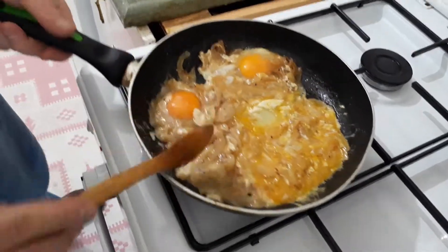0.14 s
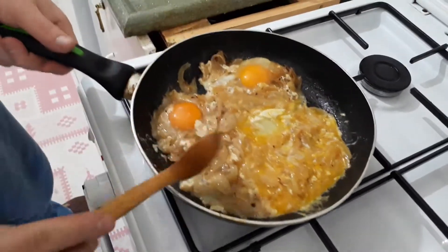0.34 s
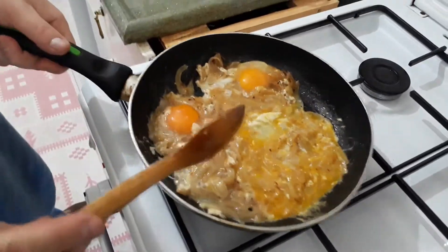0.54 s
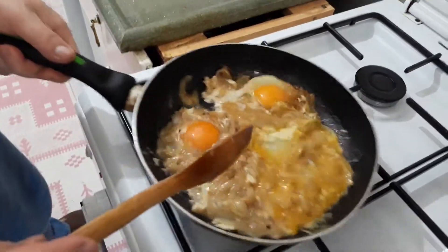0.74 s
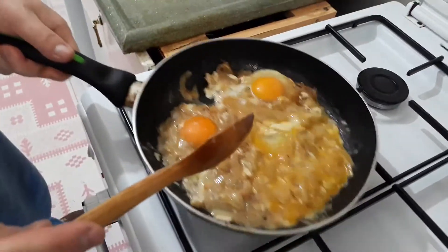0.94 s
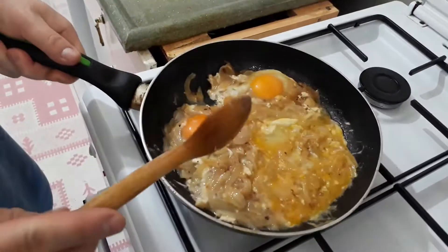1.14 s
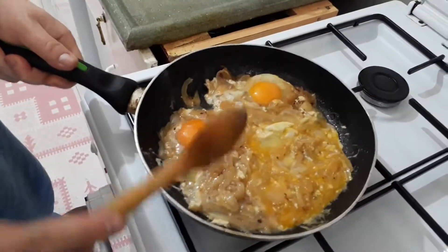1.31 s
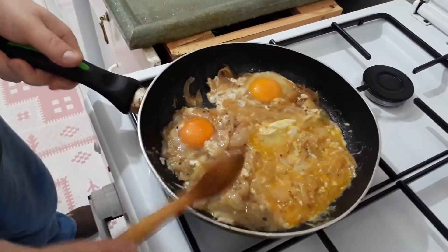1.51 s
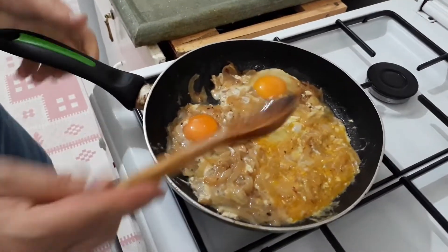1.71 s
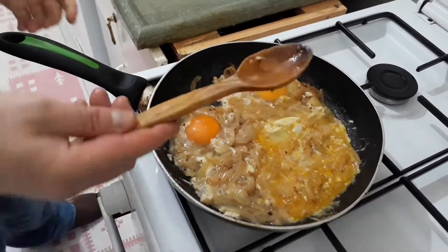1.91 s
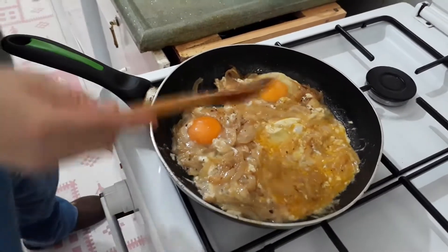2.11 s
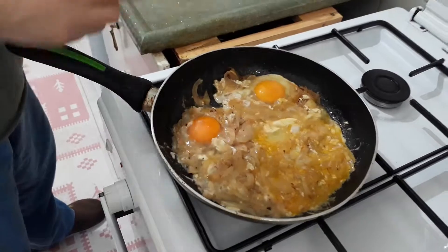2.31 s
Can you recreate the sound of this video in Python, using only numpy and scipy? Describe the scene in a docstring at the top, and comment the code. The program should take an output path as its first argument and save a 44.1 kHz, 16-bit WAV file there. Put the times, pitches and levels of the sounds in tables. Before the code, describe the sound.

A frying pan bangs on a gas hob's iron grate, close and nearly mono in a small, live kitchen. Two heavy, clattering bumps at 0.25 and 0.4 seconds make the sheet metal boom. A soft, low slide follows around 0.75, then uneven woody knocks from 0.9 to 1.4, strongest near 1.15. Three hard bumps at 1.45-1.65 distort slightly and ring away into faint, steady egg sizzle until about 2.4.

```python
"""A frying pan of eggs is jogged on a gas hob in a small kitchen, close by.
The eggs sizzle faintly throughout. First come two heavy bumps: the pan clatters on its iron grate and the
sheet-metal hob booms. Then the pan slides once on the grate in many small slips, lighter woody knocks follow,
and three more bumps close the scene. Blows are bursts of decaying noise plus decaying cosine modes;
the sizzle is coloured noise and random clicks. The loudest blows overload the microphone."""
import sys
import numpy as np
from scipy import signal
from scipy.fft import rfft, irfft
from scipy.io import wavfile

SR = 44100
rng = np.random.default_rng(int(sys.argv[2]) if len(sys.argv) > 2 else 0)


def wav_record(signal):
    """Record a signal, one row per channel, as 16-bit PCM in the file named by sys.argv[1]."""
    frames = np.transpose(np.atleast_2d(signal))
    bounded = np.clip(frames, -1, 1)
    # unit amplitude maps onto the largest positive 16-bit level
    quanta = np.round(bounded * 32767).astype(np.int16)
    wavfile.write(sys.argv[1], SR, quanta)


N = 103635
TIME = np.arange(N) / SR


def from_db(db):
    """Decibels to gain."""
    return 10 ** (np.asarray(db) / 20)


def rms_one(x):
    """Scale to rms 1."""
    return x / np.sqrt(np.mean(x ** 2) + 1e-20)


def energy_one(x):
    """Scale an impulse response to unit energy."""
    return x / np.sqrt(np.sum(x ** 2))


def at_hz(points, hz):
    """Read a table on a log-frequency axis."""
    table_hz, values = np.transpose(points)
    return np.interp(np.log(np.maximum(hz, 1)), np.log(table_hz), values)


def noise(colour, dull_hz=None, size=N):
    """Noise of a given colour with rms near 1, then optionally dulled by a gentle treble roll-off."""
    hz = np.fft.rfftfreq(size, 1 / SR)
    gain = rms_one(from_db(at_hz(colour, hz)))
    if dull_hz:
        gain = gain / np.sqrt(1 + (hz / dull_hz) ** 2)
    return irfft(rfft(rng.standard_normal(size)) * gain, size)


def dense_ring(colour, t60, dull_hz=None, size=8192):
    """Decaying noise stands for many overlapping modes that die together; t60 in s."""
    return noise(colour, dull_hz, size) * from_db(-60 * TIME[:size] / t60)


def add(out, s, x):
    """Mix x into out from time s."""
    i = max(int(s * SR), 0)
    out[i:i + len(x)] += x[:N - i]


def through(x, response):
    """Play x into an impulse response."""
    return signal.fftconvolve(x, response)[:N]


def decay(t60):
    """One second of exponential decay, down 60 dB after t60 seconds."""
    return np.exp(-np.log(1000) * TIME[:SR] / t60)


def modes(table):
    """One blow on a set of modes, each with a random sign and a strength of its own."""
    ring = np.zeros(SR)
    for hz, db, t60 in table:
        sign = rng.choice([-1, 1])
        strength = from_db(db + 3 * rng.normal())  # 3 dB spread from blow to blow
        ring += sign * strength * decay(t60) * np.cos(2 * np.pi * hz * TIME[:SR])
    return ring


def grains(per_s, spread_db):
    """Random clicks of uneven size and sign."""
    sizes = from_db(spread_db * np.minimum(rng.exponential(1, N), 4)) * rng.choice([-1, 1], N)
    return sizes * (rng.random(N) < per_s / SR)


# modes of the pan: (frequency [Hz], level in a bump [dB], level in a knock [dB], t60 [s])
PAN_MODES = [(382, -21, -24.5, 0.49), (474.6, -20, -16, .25), (494, -22.5, -19.5, 0.4),
             (603.6, -19.5, -38, 0.54), (726, -23.5, -10, 0.12), (773, -8, -7.5, 0.099),
             (820, -18.5, -18, 0.31), (916, -26, -10.5, 0.12), (1075, -24, -24, 0.22),
             (1145, -26, -16.5, 0.21), (1252, -24, 0, 0.06), (1317, -17.5, -30, 0.26),
             (1369, -13, -11, 0.19), (1515, -9, -32, 0.094), (1687, -15, -17, 0.26), (1790, -1, -26, 0.077),
             (1845, -21, -21, 0.35), (1908, -9, -9, 0.16), (2130, -10, -8.5, 0.14), (2365, -20, -13, 0.27),
             (2570, -13, -10, 0.17), (2560, -18.5, -18, 0.17), (2840, -17, -19.5, 0.35),
             (2960, -13.5, -10.5, 0.1)]
# low modes of the pan on its grate: (frequency [Hz], level [dB], t60 [s])
THUD_MODES = [(124.4, -22, 0.77), (172.5, -10, 0.37), (194.1, -7.5, 0.2)]
# modes of the hob's metal sheet: (frequency [Hz], level [dB], t60 [s])
HOB_MODES = [(93, -36, 2.04), (121.86, -24, 0.6), (247.8, -6.5, 0.34), (273, -8, .38), (333.3, -23.5, 0.38)]
CONTACT_S, HOB_SWELL_S = 0.00056, 0.0058  # rise time constants of a blow and of its low modes
ROOM_DB = -6.5


def blows(table, colour, crack_t60, crack_db, pan_modes):
    """Each blow is a short crack, the ring of the pan, a thud and the swelling boom of the hob."""
    cracks, rings = np.zeros(N), np.zeros(N)
    contact = 1 - np.exp(-TIME[:SR] / CONTACT_S)
    swell = 1 - np.exp(-TIME[:SR] / HOB_SWELL_S)
    for s, db, dull_hz, pan_db, thud_db, hob_db in table:
        crack = dense_ring(colour, crack_t60, dull_hz)
        add(cracks, s, from_db(db + crack_db) * crack * contact[:len(crack)])
        dulling = signal.butter(1, dull_hz, fs=SR)
        pan = contact * signal.lfilter(*dulling, modes(pan_modes))
        low = from_db(thud_db) * modes(THUD_MODES) + from_db(hob_db) * modes(HOB_MODES)
        add(rings, s, from_db(db) * (from_db(pan_db) * pan + swell * low))
    return cracks + rings + from_db(ROOM_DB) * kitchen(cracks)  # only the cracks feed the room


# heavy bumps, the last three columns relative to the level:
# (time [s], level [dB], dull above [Hz], pan ring [dB], low thud [dB], hob boom [dB])
BUMPS = [(.2448, -4.5, 5000, 5, -7.5, 5.5), (.3862, 1, 3950, -1.5, -7.5, 2),
         (1.4722, 3, 4600, -5.5, -12.5, -3), (1.505, -6, 6000, -4, -2, -4.5),
         (1.6287, 1.5, 3670, -0.5, -5.5, 1)]
# dense, quickly damped crack of a bump: (frequency [Hz], relative density [dB per Hz])
BUMP_CRACK_COLOUR = [(40, -5), (110, -7.5), (220, -3), (450, -5.5), (750, -2), (1100, 1), (1700, 3),
                     (2700, -4), (3600, -13.5), (6500, -13.5), (10000, -14), (15000, -22)]


def bumps():
    """The pan comes down heavily on the grate."""
    pan_modes = [(hz, bump_db, t60) for hz, bump_db, _, t60 in PAN_MODES]
    return blows(BUMPS, BUMP_CRACK_COLOUR, crack_t60=0.069, crack_db=1, pan_modes=pan_modes)


# lighter, woody knocks, the last three columns relative to the level:
# (time [s], level [dB], dull above [Hz], pan ring [dB], low thud [dB], hob boom [dB])
KNOCKS = [(.8984, -8, 1000, -2.5, -8, -10), (0.9605, -24, 1800, -10, -3, -20),
          (1.1555, 0.5, 2800, -2, -0.5, -20.5), (1.2362, -8, 2800, -2.5, -20, -11),
          (1.2893, -6.5, 2220, -1.5, -7.5, -6.5), (1.3864, -13, 1790, -3.5, -4, -8)]
# dense, quickly damped crack of a lighter knock: (frequency [Hz], relative density [dB per Hz])
KNOCK_CRACK_COLOUR = [(50, -40), (120, -18), (220, -5), (480, -4), (750, 1), (1000, -0.5), (1300, 3),
                      (1900, 1.5), (2800, -2), (3400, -16), (6500, -10), (10000, -23), (14000, -42)]
KNOCK_LOW_CUT_HZ = 100


def knocks():
    """Lighter knocks meet the pan at another spot, favour other modes and stir little bass."""
    pan_modes = [(hz, knock_db, t60) for hz, _, knock_db, t60 in PAN_MODES]
    out = blows(KNOCKS, KNOCK_CRACK_COLOUR, crack_t60=0.051, crack_db=2, pan_modes=pan_modes)
    low_cut = signal.butter(2, KNOCK_LOW_CUT_HZ, "high", fs=SR, output="sos")
    return signal.sosfilt(low_cut, out)


# the pan chatters on the grate: (time [s], level [dB], fade length [s])
CLATTERS = [(0.2479, 3, 0.011), (0.389, -2.5, 0.033), (1.164, -6, 0.023), (1.476, -1.5, 0.027),
            (1.504, -4, 0.026), (1.635, -5.5, 0.034)]
# metal against iron: (frequency [Hz], relative density [dB per Hz])
CLATTER_COLOUR = [(300, -7), (1500, -2.5), (2800, 2), (4400, -9.5), (6200, -3.5), (8500, -7), (10200, -7.5),
                  (12000, -13.5), (15000, -26.5)]
# high modes of the rim, rung once by each clatter: (frequency [Hz], level [dB], t60 [s])
RIM_MODES = [(6040, -13, .07), (6130, -14, .06), (6930, -16, .06), (10230, -18, .06)]
CHATTER_PER_S, CHATTER_SPREAD_DB = 330, 2
CLATTER_T60_S, CLATTER_ROOM_DB = 0.013, -8


def clatter():
    """After a hard blow the pan bounces on the grate in a quick, uneven run of bright contacts."""
    out = np.zeros(N)
    for s, db, length in CLATTERS:
        add(out, s, from_db(db) * modes(RIM_MODES))
        for k, (late, strength) in enumerate(rng.uniform(-1.1, 1, (16, 2))):
            jitter = .5 * late * (k > 0)  # the first contact is on time
            delay = (k + jitter) / CHATTER_PER_S
            fade = np.exp(-(delay / length) ** 2)
            gain = fade * from_db(db + CHATTER_SPREAD_DB * strength)
            add(out, s + delay, gain * dense_ring(CLATTER_COLOUR, CLATTER_T60_S, size=2048))
    return out + from_db(CLATTER_ROOM_DB) * kitchen(out)


# the slide of the pan: (time [s], level [dB])
SLIDE_LEVEL = [(.64, -53), (.70, -32.5), (0.749, -22), (.78, -32.5), (.86, -35.5), (.92, -48)]
# ring of one small slip: (frequency [Hz], relative density [dB per Hz])
SLIP_COLOUR = [(60, -18), (160, -3), (255, 8.5), (370, -9), (550, -1), (800, -5.5), (1400, -11),
               (3000, -21), (10000, -44)]
SLIPS_PER_S = 1500


def shift():
    """The pan slides a little on the grate in many small slips."""
    s, db = np.transpose(SLIDE_LEVEL)
    slip = dense_ring(SLIP_COLOUR, t60=0.16)
    slips = rms_one(through(grains(SLIPS_PER_S, spread_db=4.5), slip))
    sliding = (TIME > s[0]) * (TIME < s[-1])
    return slips * from_db(np.interp(TIME, s, db)) * sliding


# steady frying hiss and the room's murmur: (frequency [Hz], relative density [dB per Hz])
HISS_COLOUR = [(18, -41), (30, -12.5), (228, -4.5), (312, -7), (364, -1.5), (394, -18), (511, -8.5),
               (567, -15.5), (978, -10.5), (1060, -17), (1410, -6), (2630, -18), (9640, -25), (10400, -16),
               (15000, -52)]
# one tiny burst of fat: (frequency [Hz], relative density [dB per Hz])
CRACKLE_COLOUR = [(800, 8), (2000, 0), (4500, 1), (10000, 6), (13000, -58)]
# rise and fall of the crackle, relative to CRACKLE_DB: (time [s], level [dB])
CRACKLE_LEVEL = [(0, 1), (.2, 2), (.65, -1), (.82, 5), (1.05, -3.5), (1.9, -1.5), (2.35, -3.5)]
HISS_DB, CRACKLE_DB = -37.5, -47
CRACKLES_PER_S, CRACKLE_SPREAD_DB = 1200, 4


def sizzle():
    """Steady frying hiss over the room's murmur, with tiny bursts of fat."""
    burst = dense_ring(CRACKLE_COLOUR, t60=0.0077, size=512)
    crackle = rms_one(through(grains(CRACKLES_PER_S, CRACKLE_SPREAD_DB), burst))
    crackle_db = CRACKLE_DB + np.interp(TIME, *np.transpose(CRACKLE_LEVEL))
    return from_db(HISS_DB) * noise(HISS_COLOUR) + from_db(crackle_db) * crackle


# how long the kitchen rings: (frequency [Hz], t60 [s])
ROOM_T60 = [(60, 0.33), (130, 1), (300, 0.77), (1000, 0.41), (3000, 0.34), (7000, 0.24), (14000, 0.18)]
ROOM_BUILD_S = 0.006


def kitchen(x):
    """Diffuse reflections, noise bands with their own decay, build up quickly and die sooner in the treble."""
    hz = np.fft.rfftfreq(SR, 1 / SR)
    white = rfft(rng.standard_normal(SR))
    tail = np.zeros(SR)
    edges = np.geomspace(25, 20000, 13)
    for low, high in zip(edges, edges[1:]):
        band = irfft(white * (hz >= low) * (hz < high), SR)
        tail += band * decay(at_hz(ROOM_T60, np.sqrt(low * high)))
    tail *= 1 - np.exp(-TIME[:SR] / ROOM_BUILD_S)
    return through(x, energy_one(tail))


# slight difference between the two microphone ports: (frequency [Hz], relative density [dB per Hz])
PORT_COLOUR = [(60, 2), (250, -11), (1400, -14), (2600, 6), (12000, 9)]
# faint steady noise that differs between left and right: (frequency [Hz], relative density [dB per Hz])
SIDE_NOISE_COLOUR = [(18, -34), (30, -4), (132, -5), (1090, -2), (1340, -8), (3680, 2), (7240, -10),
                     (11300, -6), (15000, -15)]
SIDE_DB, SIDE_NOISE_DB = -40, -61


def width(pan):
    """A slight difference between the two microphone ports, and faint steady noise, set left against right."""
    port = energy_one(dense_ring(PORT_COLOUR, t60=.03, size=2048))
    mismatch = from_db(SIDE_DB) * through(pan, port)
    return mismatch + from_db(SIDE_NOISE_DB) * noise(SIDE_NOISE_COLOUR)


def scene():
    """Everything sits in the middle; the port mismatch and a faint steady noise give a trace of width."""
    pan = bumps() + knocks() + clatter() + shift()
    side = width(pan) * np.array([[1], [-1]])  # opposite signs left and right
    return pan + sizzle() + side


OVERLOAD, OVERLOAD_KNEE = 0.93, 14  # ceiling [full scale] and sharpness of the bend below it


def record(dry):
    """The microphone overloads: loud peaks are flattened, then the top is cut."""
    flat = dry / (1 + np.abs(dry / OVERLOAD) ** OVERLOAD_KNEE) ** (1 / OVERLOAD_KNEE)
    top_cut = signal.cheby2(12, 70, 16500, fs=SR, output="sos")  # 70 dB down from 16500 Hz up
    return np.clip(signal.sosfilt(top_cut, flat), -1, 1)


dry = scene()
out = record(dry)
wav_record(out)
```